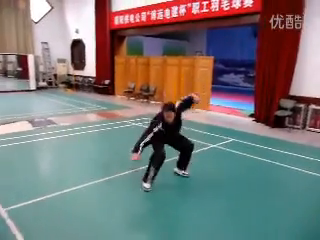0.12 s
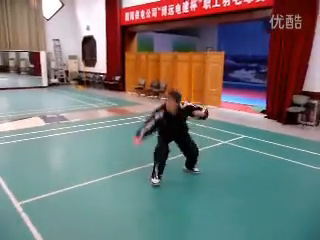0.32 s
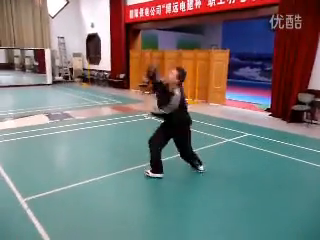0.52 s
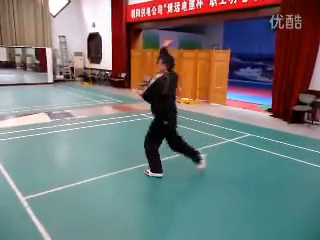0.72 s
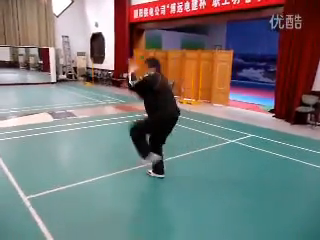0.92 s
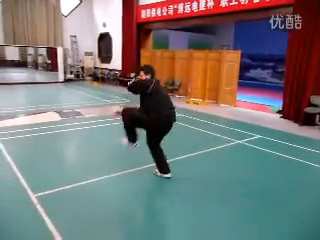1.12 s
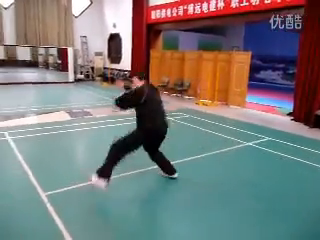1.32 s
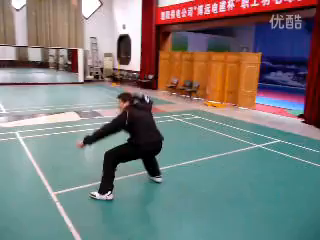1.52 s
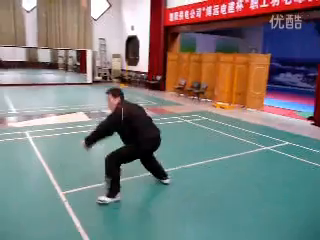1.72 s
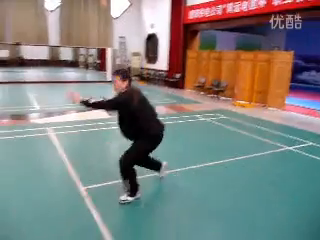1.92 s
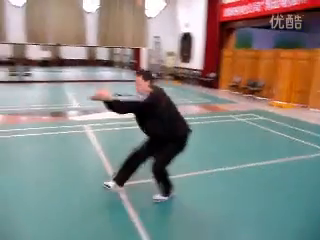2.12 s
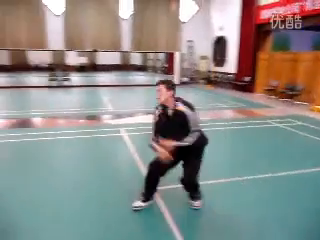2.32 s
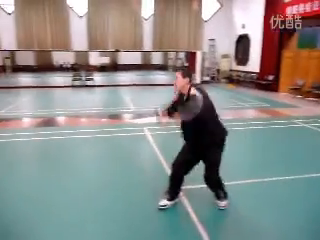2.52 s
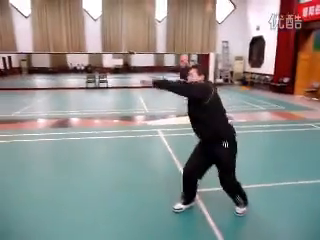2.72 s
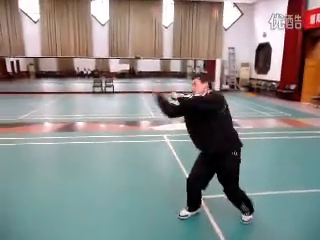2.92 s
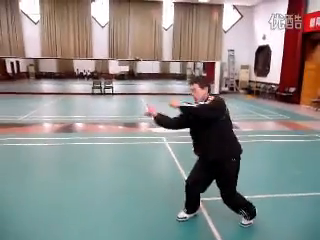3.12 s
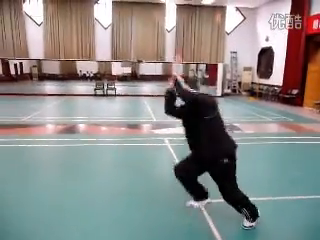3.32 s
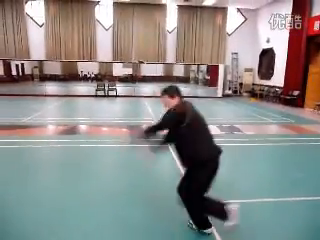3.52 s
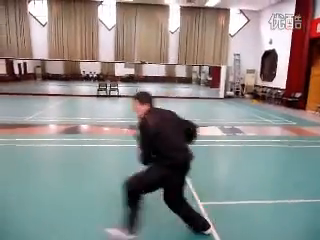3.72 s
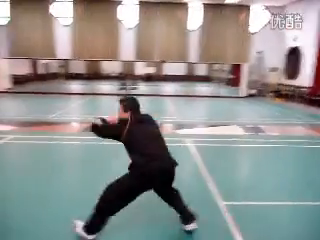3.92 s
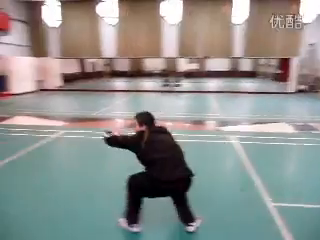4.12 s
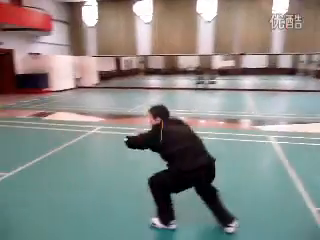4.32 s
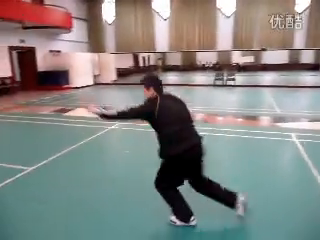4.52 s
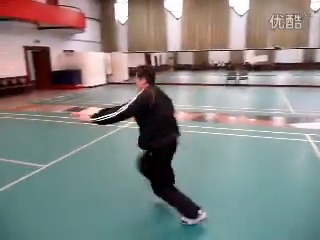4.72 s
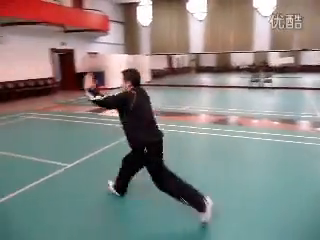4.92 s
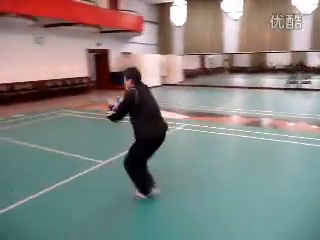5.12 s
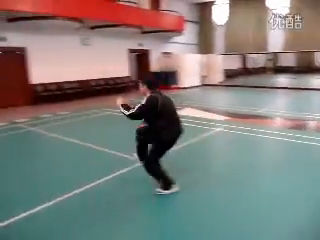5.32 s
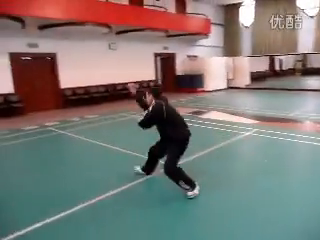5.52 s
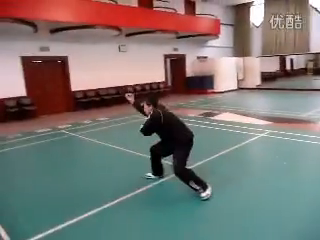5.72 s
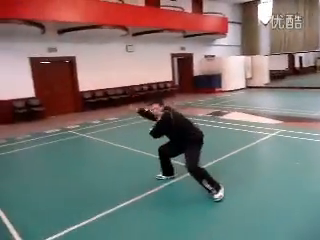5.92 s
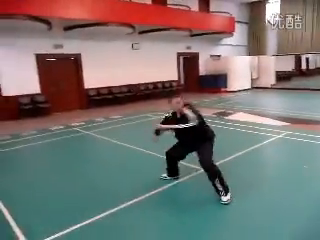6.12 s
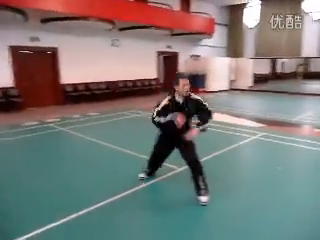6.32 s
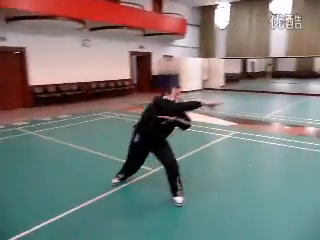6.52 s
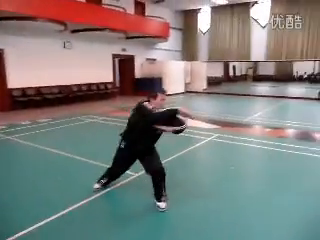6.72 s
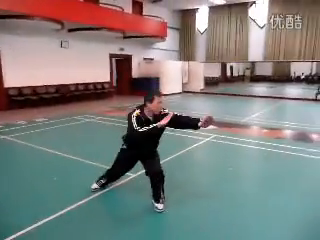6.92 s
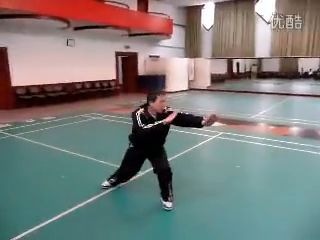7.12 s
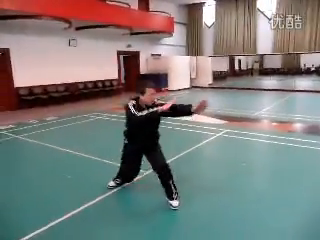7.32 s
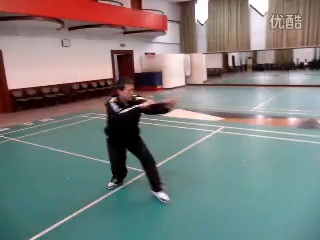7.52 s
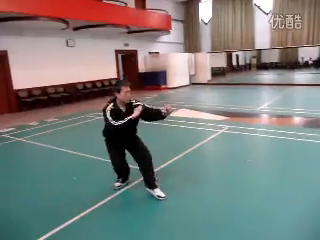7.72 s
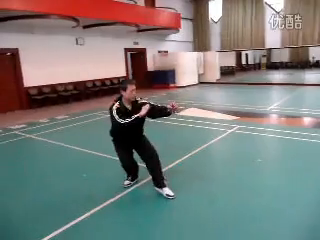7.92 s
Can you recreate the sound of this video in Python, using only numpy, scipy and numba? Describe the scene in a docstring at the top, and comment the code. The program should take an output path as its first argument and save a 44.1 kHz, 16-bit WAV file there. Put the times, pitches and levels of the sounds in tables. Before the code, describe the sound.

Cracking blows and booming foot stamps ring around a big hall, between light steps, tracksuit swishes and constant ventilation hiss.

```python
"""Sharp slaps and stamps ring through a large empty sports hall as a martial artist runs through a form.
Each blow is a crack, a pop of squeezed air, a body thump and a boom from the sprung floor. Between
the blows come light steps and the swish and snap of tracksuit and shoes, over a steady ventilation hiss.
A narrow-band microphone dulls it all, and the hardest blows duck the level and distort."""
import sys
import numpy as np
from scipy import signal
from scipy.fft import rfft, irfft, next_fast_len
from scipy.io import wavfile
from scipy.ndimage import uniform_filter1d
from numba import njit

SR = 44100
rng = np.random.default_rng(int(sys.argv[2]) if len(sys.argv) > 2 else 0)


def to_wav(s):
    """Save 16-bit WAV."""
    ch = np.atleast_2d(s).T  # columns
    pcm = np.round(np.clip(ch, -1, 1) * 32767)  # PCM
    wavfile.write(sys.argv[1], SR, pcm.astype(np.int16))


N = 352260
FLOOR_HALL_DB = 5  # the wide floor feeds the hall more than a palm or sole does


def undb(db):
    """Decibels to gain."""
    return 10 ** (np.asarray(db) / 20)


def unit(x):
    """Scale to an rms of 1."""
    return x / np.sqrt(np.mean(x ** 2))


def along(points, hz):
    """Read a (Hz, value) table on a log-frequency axis."""
    f, value = np.transpose(points)
    return np.interp(np.log(np.maximum(hz, 1)), np.log(f), value)


def colour(x, points):
    """Equalise by a (Hz, dB) table."""
    size = next_fast_len(len(x) + SR // 10)
    gain = undb(along(points, np.fft.rfftfreq(size, 1 / SR)))
    return irfft(rfft(x, size) * gain, size)[:len(x)]


def band_noise(size, hz, width):
    """Noise passed twice through one resonance, rms 1."""
    b, a = signal.iirpeak(hz, hz / width, fs=SR)
    return unit(signal.lfilter(b, a, signal.lfilter(b, a, rng.standard_normal(size))))


def add(track, start, sound):
    """Mix a sound in from a start time in seconds."""
    i = max(int(start * SR), 0)
    part = sound[:max(N - i, 0)]
    track[i:i + len(part)] += part


def pulse(t, hz, cycles):
    """A heavily damped swing whose envelope peaks at 1 after the given number of cycles."""
    age = np.maximum(t, 0) * hz / cycles
    return -age * np.exp(1 - age) * np.sin(2 * np.pi * hz * t)


@njit
def follow(x, attack, release):
    """Peak follower with separate rates for rising and falling."""
    out, level = np.empty(len(x)), 0.
    for i in range(len(x)):
        rectified = abs(x[i])
        level += (rectified - level) * (attack if rectified > level else release)
        out[i] = level
    return out


def ventilation(rush_db=-32.5):
    """A steady bed of rushing air with a few narrow duct resonances."""
    # Tone of the air and microphone hiss. Each row: frequency in Hz, relative level in dB.
    hiss_curve = [(25, 0.5), (50, -10.5), (90, -9.5), (140, -5), (300, -1.35), (550, -6.5), (870, -6),
                  (1150, -10.5), (1500, -11), (2100, -13.5), (2700, -16.5), (3500, -14.5), (5000, -20)]
    # Duct resonances. Each row: centre in Hz, width in Hz, level in dB.
    ducts = [(133.6, 27, -54.5), (353, 62, -50.5), (1787.5, 70, -47.5)]
    rush = undb(rush_db) * unit(colour(rng.standard_normal(N), hiss_curve))
    return rush + sum(undb(db) * band_noise(N, hz, width) for hz, width, db in ducts)


def hall(gap_s=0.0016, build_s=0.012, first_per_s=700, thicken_s=0.03, diffuse=0.66):
    """Reverb for one spot on the court: reflections thicken into a tail, the treble dying first."""
    # Tone of the reverb. Each row: frequency in Hz, gain in dB.
    reverb_curve = [(50, -9), (90, -0.5), (130, -7), (180, -2.5), (250, -1.5), (450, -1.5), (570, -3.5),
                    (950, 0), (1250, 0.5), (1650, 2), (2100, -1.5), (2800, 2), (4500, 7)]
    # Room modes that every blow rings. Each row: centre in Hz, width in Hz, boost in dB.
    room_modes = [(124, 15, 6), (574.5, 16, 4.5)]
    # Length of the tail. Each row: frequency in Hz, seconds to fall by 60 dB.
    decay_times = [(80, 1.54), (250, 2.06), (550, 2.14), (1100, 1.745), (2200, 1.46), (4500, 1.03)]
    size = 2 ** 17
    t, f = np.arange(size) / SR, np.fft.rfftfreq(size, 1 / SR)
    density = np.minimum(first_per_s * (1 + (t / thicken_s) ** 2) / SR, 1)
    reflections = (rng.random(size) < density) * rng.choice([-1, 1], size) / np.sqrt(density)
    arrivals = np.sqrt(diffuse) * rng.standard_normal(size) + np.sqrt(1 - diffuse) * reflections
    spectrum = rfft(arrivals) * undb(along(reverb_curve, f))
    for hz, width, db in room_modes:
        spectrum *= undb(db / (1 + (2 * (f - hz) / width) ** 2))
    centres, t60s = np.transpose(decay_times)
    tail = np.zeros(size)
    for share, t60 in zip(np.eye(len(centres)), t60s):
        band = irfft(spectrum * along(np.c_[centres, share], f))
        tail += band * np.exp(-np.log(1000) * t / t60)
    build = 1 - np.exp(-np.maximum(t - gap_s, 0) / build_s)
    return tail * build * undb(-31.0)


def in_hall(sound, wet_db, reverb, floor_echo_db=-6, wall_s=0.014, wall_db=-11):
    """The direct sound, its first echoes (each slightly scattered) and the long tail."""
    # Echoes off the performer, far walls and ceiling. Each row: delay in seconds, level in dB.
    early_echoes = [(.0022, -19.5), (0.052, -16), (0.107, -15)]
    floor_echo_s, scatter_db, scatter_s = 0.0047, -14, 0.0016
    near, t = np.zeros(len(reverb)), np.arange(SR // 100) / SR
    near[0] = 1
    for delay, db in early_echoes + [(floor_echo_s, floor_echo_db), (wall_s, wall_db)]:
        echo = undb(scatter_db) * rng.standard_normal(len(t)) * np.exp(-t / scatter_s)
        echo[0] = 1
        arrival = delay * (1 + .02 * rng.uniform(-1, 1))
        add(near, arrival, undb(db) * echo / np.linalg.norm(echo))
    # close by the bass is thin; it builds up in the hall
    near = signal.lfilter(*signal.butter(1, 117, "high", fs=SR), near + 1e-18)
    return signal.fftconvolve(sound, near + reverb * undb(wet_db))


def swishes(width_ratio=1.2, flutter_db=3.0, wet_db=-7.0):
    """Sleeves and trouser legs whip, soles brush: a fluttering swell that follows the limb's speed."""
    # Each row: peak time in seconds, a quarter of the length in seconds, level in dB, centre in Hz.
    swings = [ (0.204, 0.073, -32.5, 1710), (0.439, 0.091, -36, 420), (0.66, 0.094, -37, 717),
              (1.063, 0.13, -34.5, 640), (1.119, 0.09, -47.5, 2420), (1.428, 0.038, -37.5, 622),
              (1.541, 0.027, -33.5, 1916), (2.187, 0.07, -34, 620), (3.697, 0.016, -21, 2330),
              (3.786, 0.024, -31, 1840), (4.068, 0.032, -31.5, 2090), (4.669, 0.08, -35.5, 594),
              (6.505, 0.016, -27, 563), (6.589, 0.037, -33, 600), (6.934, 0.035, -35, 600),
              (7.633, 0.043, -35.5, 770), (7.667, 0.08, -42.5, 2500), ]
    out = np.zeros(N)
    for peak, quarter, db, hz in swings:
        size = int(4 * quarter * SR)
        folds = unit(uniform_filter1d(rng.standard_normal(size), size=220))
        rub = unit(band_noise(size, hz, width_ratio * hz) * undb(flutter_db * folds))
        add(out, peak - 2 * quarter, undb(db) * np.hanning(size) * rub)
    return in_hall(out, wet_db, hall())[:N]


def spatter(t, db, hz=1670, width=3500, decay_s=0.0015):
    """Skin, cloth and rubber do not land all at once: a short burst of noise follows the first touch."""
    return undb(db) * band_noise(len(t), hz, width) * np.exp(-t / decay_s)


def snaps(width_ratio=0.55, decay_s=0.0038, wet_db=-14):
    """The tracksuit pulls taut or a sole catches on the floor: a crisp, nearly dry burst."""
    # Each row: start in seconds, level in dB, centre in Hz.
    bursts = [ (0.649, -36, 1093), (4.031, -20, 2070), (4.1075, -16, 3420), (5.0147, -28.5, 3500),
              (6.366, -27.5, 1200), (6.408, -29.5, 994), (6.41, -29, 2900), (6.488, -26, 900),
              (6.553, -30, 700), (6.945, -29, 1500), (7.484, -31, 1600), ]
    out, t = np.zeros(N), np.arange(SR // 10) / SR
    for start, db, hz in bursts:
        add(out, start, spatter(t, db, hz, width_ratio * hz, decay_s))
    return in_hall(out, wet_db, hall())[:N]


def floor_boom(t, db, lag_s=0.0042):
    """The sprung floor gives and booms once the weight has come down on it."""
    return undb(db) * pulse(t - lag_s, hz=133.8, cycles=0.26)


def steps(tick_db=-9.5, scuff_db=-6, wet_db=-3.5):
    """Light footwork: the sole ticks, taps and scuffs; the floor booms as it takes the weight."""
    # Steps and shifts of weight. Each row: start in seconds, sole level in dB, floor boom in dB.
    footfalls = [ (0.677, -23.5, -25.5), (0.87, -35.5, -26.5), (2.9446, -24, -39.5), (3.0506, -31, -46),
                 (3.267, -26.5, -46), (3.4232, -26.5, -36.5), (4.013, -8, -25.5), (4.9277, -22.5, -41.5),
                 (5.0147, -11.5, -24.5), (5.0205, -23.5, -34), (5.032, -23.5, -20), (6.408, -17.5, -44),
                 (6.489, -27, -50), (6.945, -23, -39), (6.960, -28.5, -49), (7.215, -26, -26), ]
    soles, floor, t = np.zeros(N), np.zeros(N), np.arange(SR // 10) / SR
    tap = pulse(t, hz=640, cycles=0.54)
    tick = undb(tick_db) * pulse(t, hz=1800, cycles=0.17)
    for start, sole_db, floor_db in footfalls:
        scuff = spatter(t, scuff_db, hz=765, width=1100, decay_s=0.0067)
        add(soles, start, undb(sole_db) * (tap + tick + scuff))
        add(floor, start, floor_boom(t, floor_db))
    return (in_hall(soles, wet_db, hall()) + in_hall(floor, FLOOR_HALL_DB, hall()))[:N]


def strikes(crack_ring=0.42, spatter_db=-10, pocket_db=-5.5, pocket_hall_db=-16):
    """Each blow cracks, squeezes out a slap of air, thumps the body and booms in the floor."""
    # Hard slaps and stamps. Each row: start in seconds, slap in dB, slap pitch in Hz, crack in dB,
    # crack pitch in Hz, slap rise in cycles, body thump in dB, floor boom in dB, reverb send in dB,
    # floor echo in dB, wall echo delay in seconds, wall echo in dB, brush in dB.
    blows = [ (0.0085, -7, 564, -15, 1460, 0.53, -16, -20.5, 2.7, 3.5, 0.023, -4, -49),
             (1.4819, 0.8, 612, -6, 2500, 0.35, -10, -22, -2, -12, 0.037, -12, -47),
             (2.293, 5.5, 629, 9, 1230, 0.35, -10.5, -33.5, -1.67, -3.5, .029, -6, -35),
             (3.5931, 14.5, 584, 14.2, 1040, 0.29, -0.5, -9.5, -0.2, -10, .032, -7, -22),
             (5.1435, 6, 727, 7.5, 1710, 0.53, -5.5, -40.5, -3, -1, 0.019, -4.5, -13),
             (5.6082, -8, 564, 6.5, 1790, 1, -7.5, -5.5, -4, -11.5, 0.011, -8, -39), ]
    slap_lag_s, pocket_lag_s, brush_lead_s = 0.00019, 0.0006, 0.0058
    out, t = np.zeros(N), np.arange(SR // 10) / SR
    spots = [hall() for _ in range(7)]
    for k, (start, slap_db, slap_hz, crack_db, crack_hz, cycles,
            body_db, floor_db, wet_db, *echoes, brush_db) in enumerate(blows):
        crack = undb(crack_db) * pulse(t, crack_hz, crack_ring * cycles)
        slap = undb(slap_db) * pulse(t - slap_lag_s, slap_hz, cycles)
        # air trapped under palm or sole rings briefly after the crack
        pocket = undb(slap_db + pocket_db) * pulse(t - pocket_lag_s, hz=836, cycles=0.63)
        thump = undb(body_db) * pulse(t, hz=320.5, cycles=0.42)
        boom = floor_boom(t, floor_db)
        # the layers radiate differently, so each takes its own paths round the hall
        layers = [(crack, 0), (slap, 0), (pocket, pocket_hall_db), (thump, 0), (boom, FLOOR_HALL_DB)]
        for j, (layer, extra_wet_db) in enumerate(layers):
            reverb = spots[(k + j) % len(spots)]
            add(out, start, in_hall(layer, wet_db + extra_wet_db, reverb, *echoes))
        add(out, start, spatter(t, crack_db + spatter_db))
        # a sleeve or sole edge brushes the target just before the blow lands
        add(out, start - brush_lead_s, spatter(t, brush_db))
    return out


def scene():
    """Strikes, steps, snaps and swishes over the ventilation, in mono."""
    return (strikes() + steps() + snaps() + swishes() + ventilation())[None]


def record(dry, limit_db=-6.5, attack_s=0.00077, release_s=0.024, react_s=0.0039, offset=-0.066):
    """A dull microphone, a limiter too slow for the attacks and an off-centre converter they overload."""
    # Microphone response. Each row: frequency in Hz, gain in dB.
    mic_curve = [(1500, -2), (2800, -1.5), (3400, -6), (4000, -12), (4500, -17.5), (4900, -32), (5300, -70)]
    low_cut_hz, dull_hz, top_hz = 55, 12000, 16000
    t = np.arange(N) / SR
    low_cut = signal.butter(2, low_cut_hz, "high", fs=SR, output="sos")
    mic = signal.sosfilt(low_cut, colour(dry[0], mic_curve))
    envelope = follow(mic, 1 / (attack_s * SR), 1 / (release_s * SR))
    late_envelope = np.interp(t - react_s, t, envelope)
    gain = np.minimum(1, undb(limit_db) / np.maximum(late_envelope, 1e-9))
    limited = mic * uniform_filter1d(gain, size=24)
    clipped = np.clip(limited + offset, -1, 1)
    rounded = signal.lfilter(*signal.butter(1, dull_hz, fs=SR), clipped)
    high_cut = signal.ellip(8, .2, 70, top_hz, fs=SR, output="sos")
    return signal.sosfilt(high_cut, rounded)[None]


dry = scene()
out = record(dry)
to_wav(out)
```